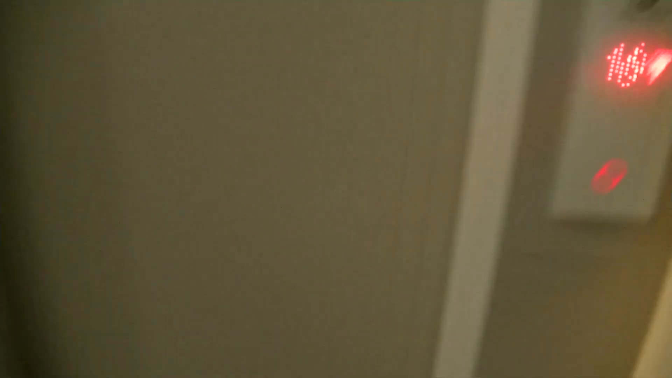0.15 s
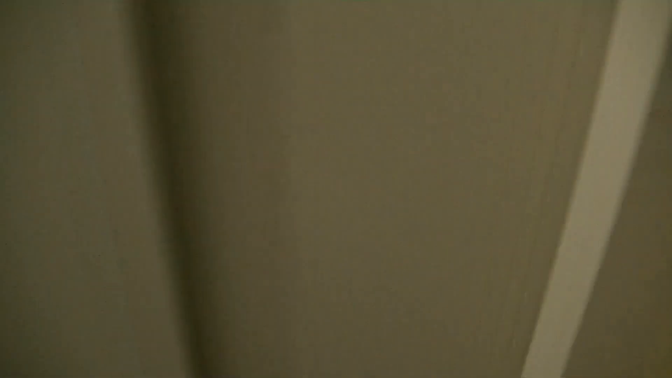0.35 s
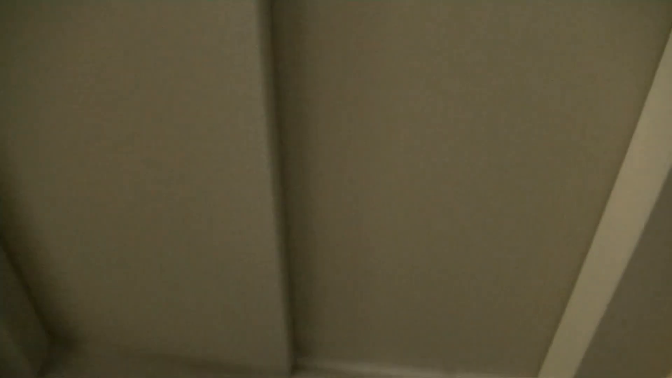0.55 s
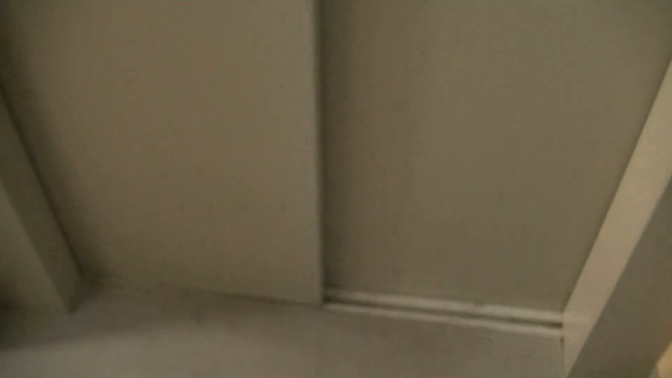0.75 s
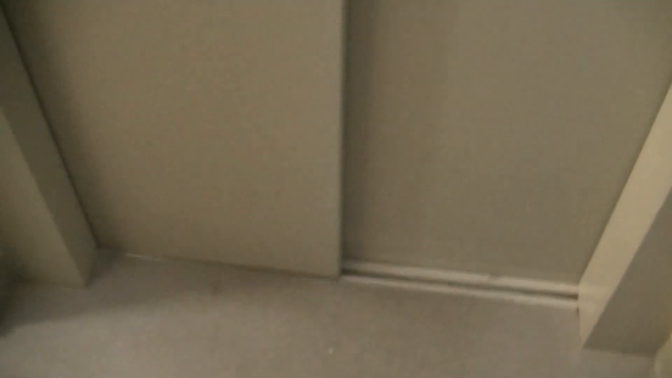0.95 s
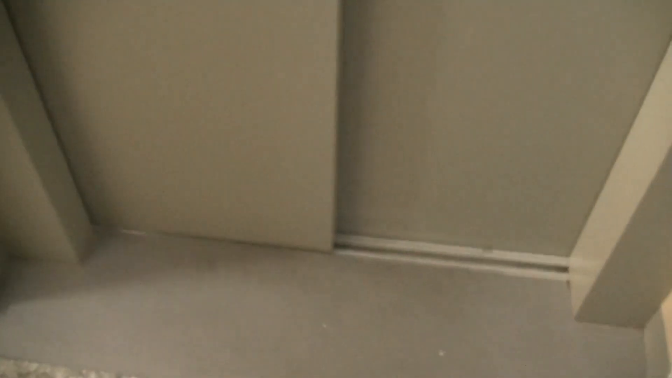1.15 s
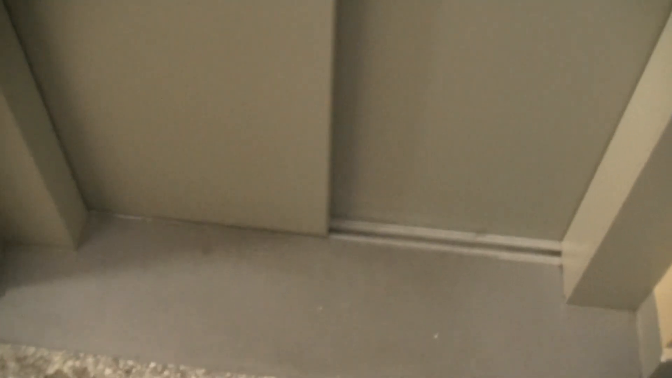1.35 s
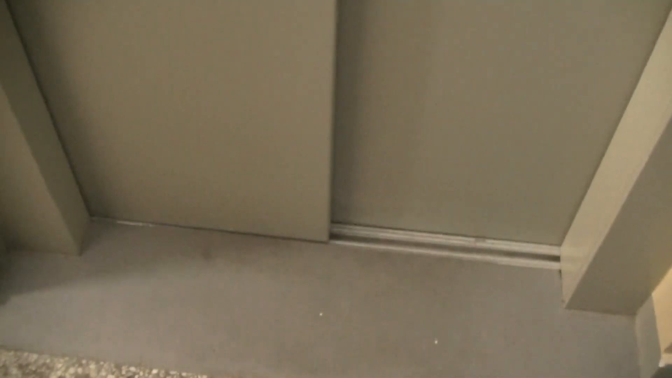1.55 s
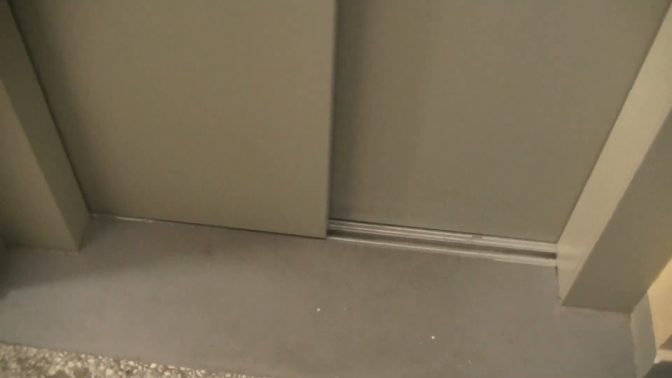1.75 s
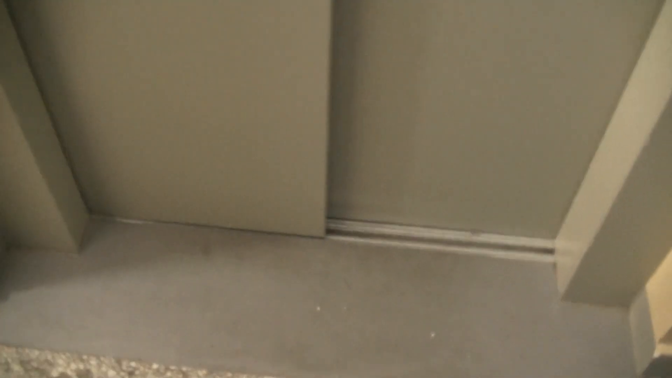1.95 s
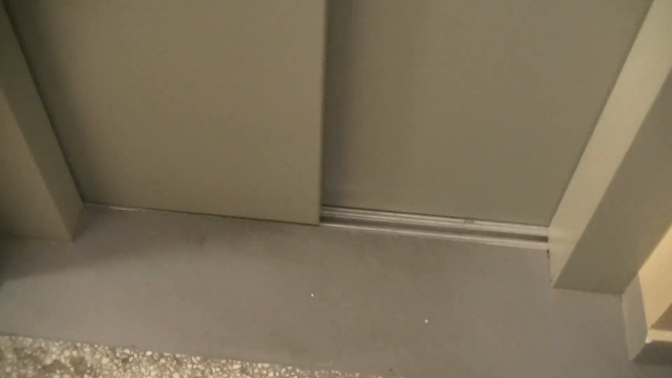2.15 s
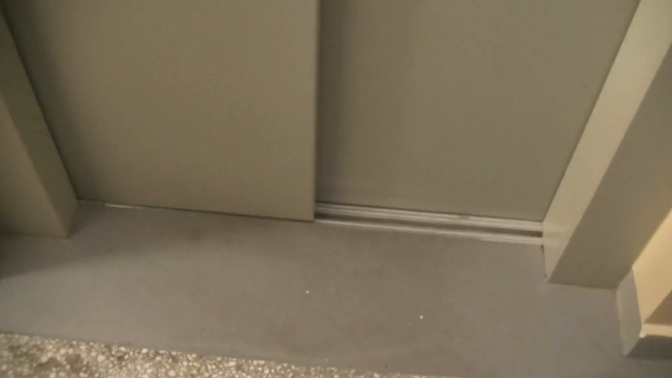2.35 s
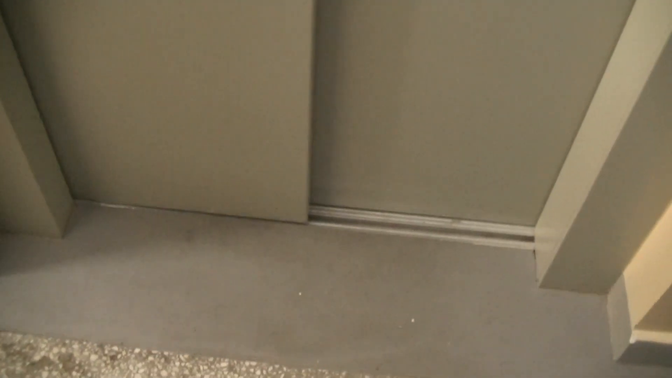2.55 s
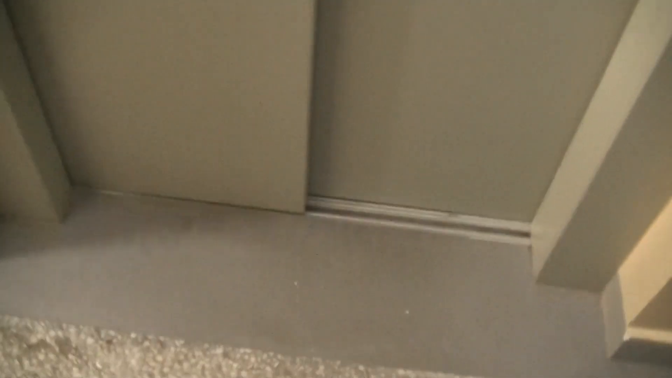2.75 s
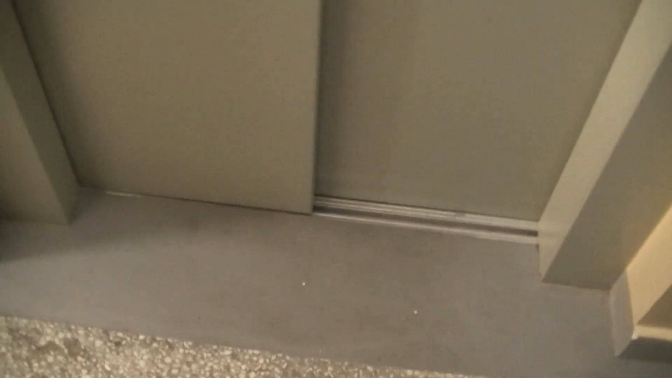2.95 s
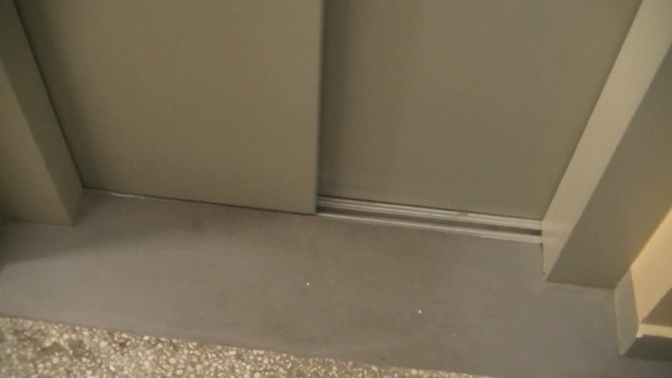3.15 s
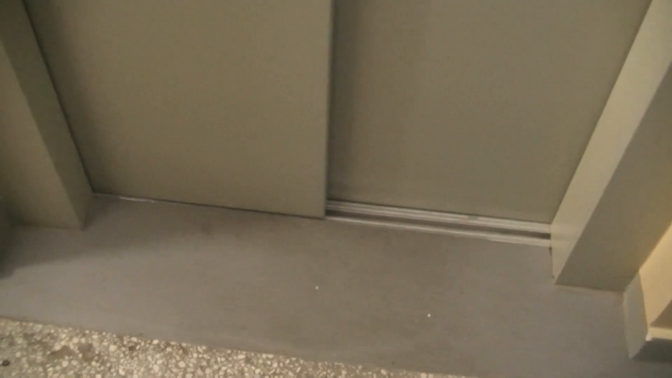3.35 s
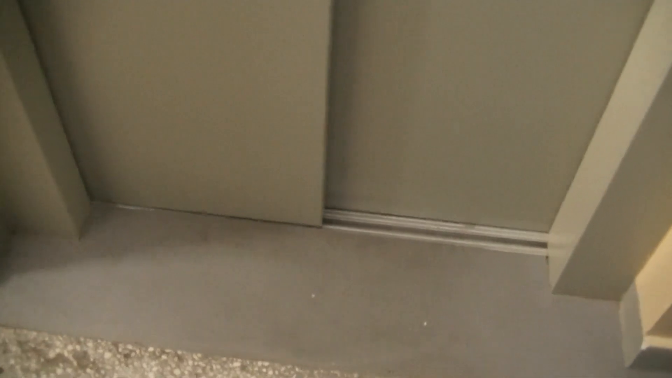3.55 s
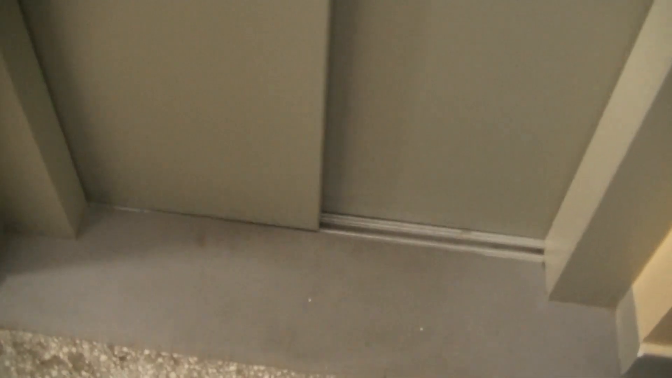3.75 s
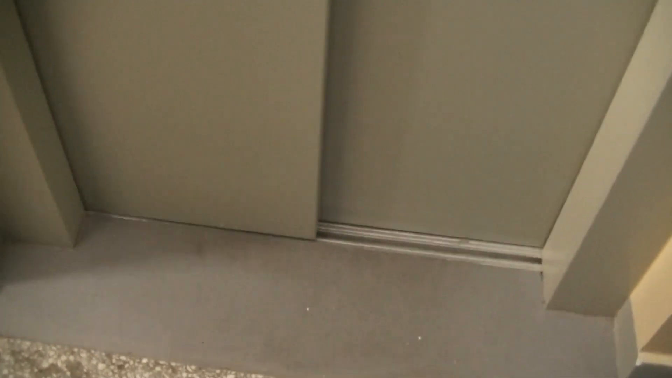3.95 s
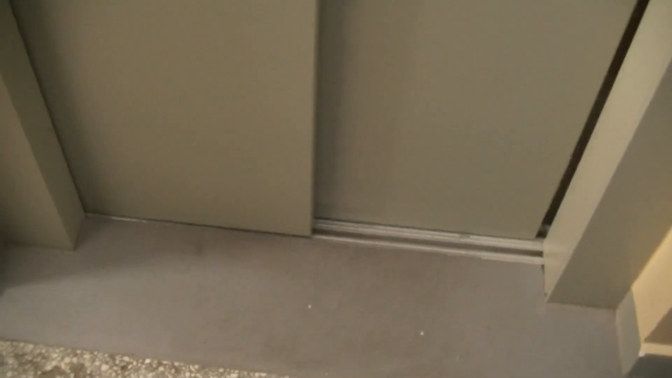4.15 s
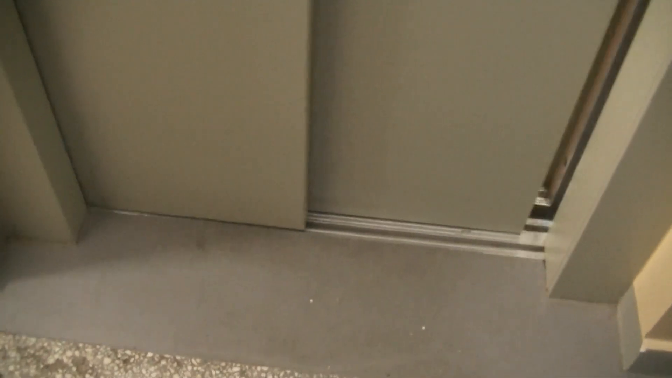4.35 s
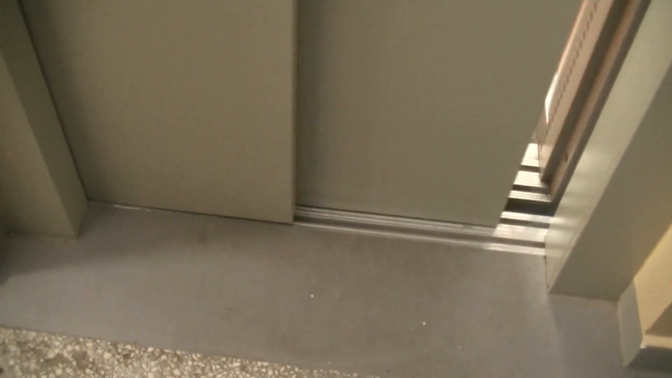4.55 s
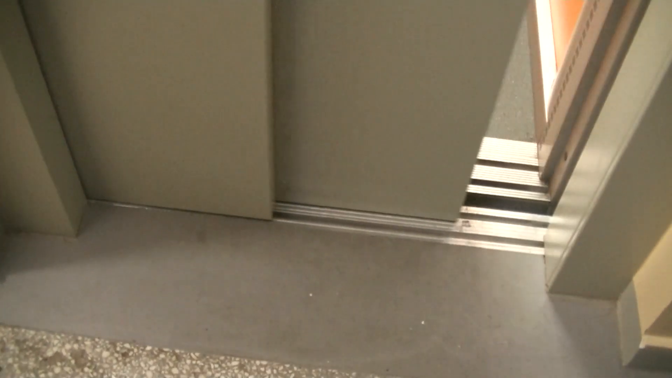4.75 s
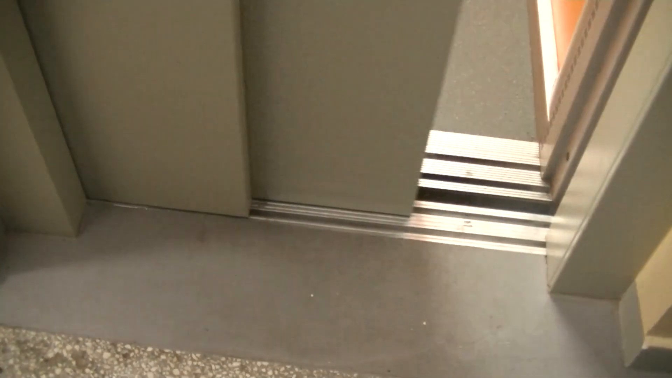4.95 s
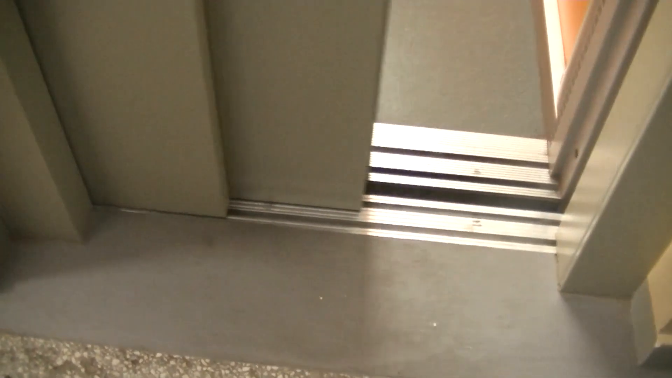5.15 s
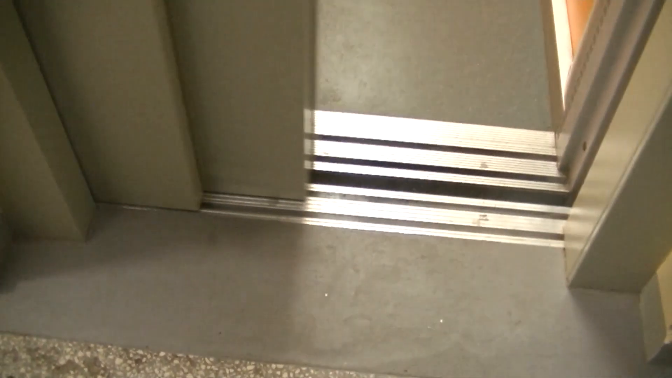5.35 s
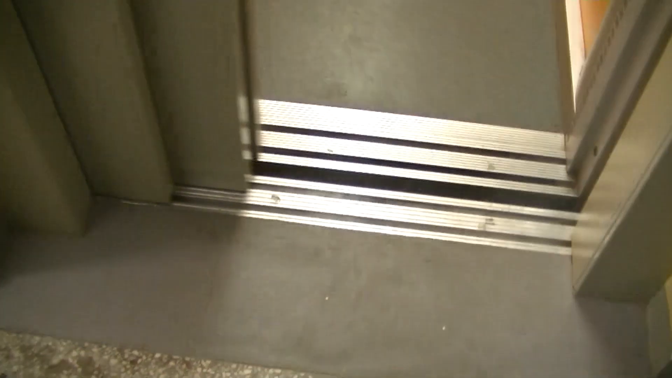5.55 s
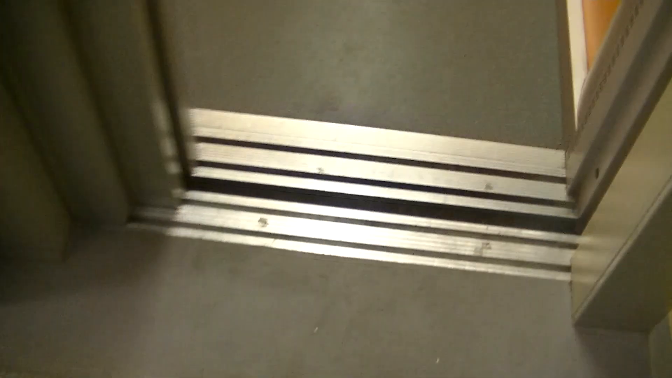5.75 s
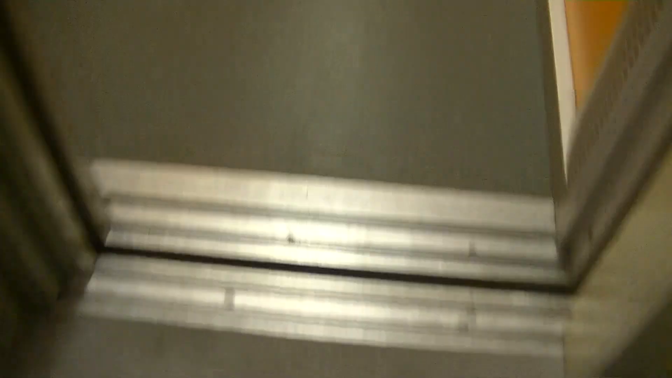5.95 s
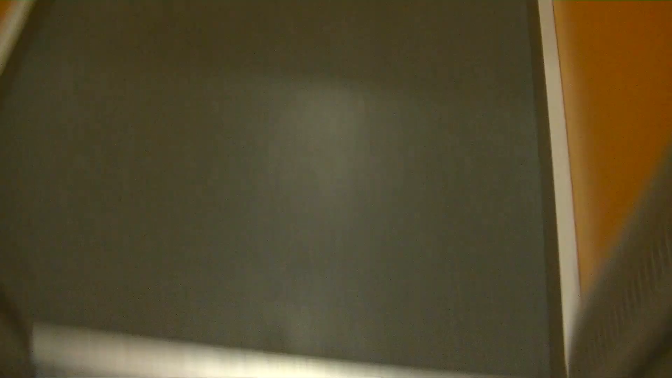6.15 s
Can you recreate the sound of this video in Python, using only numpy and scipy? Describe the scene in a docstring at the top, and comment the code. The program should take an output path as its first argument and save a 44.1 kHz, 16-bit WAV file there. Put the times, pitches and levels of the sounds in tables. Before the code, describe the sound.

Close handling noise opens the scene: cloth rubbing and several hard plastic snaps within about a second. Near silence follows, with soft hiss, a distant metallic knock and hum, and later two more thin blows. A stronger cluster of latch clunks starts the lift doors; their low rumble and gritty sliding rush swell steadily, with brief high squeaks ringing in the stairwell. A small hand-held microphone stands close to the doors.

```python
"""A quiet stairwell landing: a hand-held camera clicks and a sleeve rustles while a lift arrives.
Air, cloth, rollers and door shoes are coloured noise; the clicks are sums of short decaying modes.
Brake and latches knock in the shaft, each band of the blow ringing away at its own speed, and panel modes
hum on as wavering tones. The sheet-metal doors then slide open: rollers rumble in the panels, guide shoes
rush along the sill, with pings and squeaks as narrow noise bursts."""
import sys
import numpy as np
from scipy import signal
from scipy.fft import rfft, irfft
from scipy.io import wavfile
from scipy.ndimage import uniform_filter1d

SR = 44100
rng = np.random.default_rng(int(sys.argv[2]) if len(sys.argv) > 2 else 0)


def materialize(psi):
    """Save the field psi as 16-bit PCM at rate SR to the path in sys.argv[1].

    A 1-D psi becomes a single channel; in a 2-D psi each row is a channel.
    """
    bounded = np.clip(np.atleast_2d(psi).T, -1, 1)
    quanta = np.round(bounded * 32767).astype(np.int16)
    wavfile.write(sys.argv[1], SR, quanta)


N = 276992
TIME = np.arange(N) / SR  # s

# stereo width of the landing air and cloth: (frequency [Hz], side minus mid [dB])
AIR_WIDTH = [(60, -39), (110, -11), (200, -0.5), (380, -2), (700, -12), (1290, -11.5), (2380, -7.5),
             (4400, -6), (8120, -1), (15000, -2)]
# stereo width of the lift and the scrape: (frequency [Hz], side minus mid [dB])
LIFT_WIDTH = [(60, -16), (110, -23), (200, -24), (380, -19.5), (700, -17.5), (1290, -11.5), (2380, -11.5),
              (4400, -8.5), (8120, -1), (15000, -10)]
# door-panel modes: (frequency [Hz], width [Hz], level over the surrounding noise [dB])
PANEL_MODES = [(128, 54, 7.5), (180, 12, 7.5), (231, 14.5, 7.5), (277.5, 14.5, 13.5), (314, 11, 13),
               (356, 8.3, 14.5), (475, 4.7, 9.5), (550, 51, 4)]


def amp(db):
    """Decibels to an amplitude factor."""
    return 10 ** (np.asarray(db) / 20)


def read(points, hz):
    """Value of a (frequency, value) curve, joined by straight lines over log frequency."""
    f, value = np.transpose(points)
    return np.interp(np.log(hz + 1), np.log(f + 1), value)


def curve(rows):
    """Columns at audio rate, and a gate that is open while the rows last, with 30 ms ramps."""
    s, *columns = np.transpose(rows)
    inside = np.minimum(TIME - s[0] + 1e-3, s[-1] - TIME + 1e-3)
    gate = np.clip(inside / 0.03, 0, 1)
    return [gate] + [np.interp(TIME, s, c) for c in columns]


def modes(table, hz):
    """Gain of broad noise with resonances standing over it; their powers add."""
    peaks = sum((amp(2 * db) - 1) / (1 + (2 * (hz - f) / width) ** 2) for f, width, db in table)
    return np.sqrt(1 + peaks)


def band(hz, low_hz, high_hz):
    """Gain of a steep band-pass."""
    return 1 / np.sqrt((1 + (low_hz / (hz + 1)) ** 20) * (1 + (hz / high_hz) ** 20))


def sheet_metal(hz, depth_db):
    """The dense, uneven comb of modes of a steel panel: a random gain every 25 Hz."""
    return amp(depth_db * np.interp(hz, np.arange(640) * 25, rng.standard_normal(640)))


def noise(gain, width, size=N, patchy_db=0.):
    """Two-channel noise, rms 1 in the middle, with colour gain(hz), a stereo width and drifting patches."""
    # balance of the channels: (frequency [Hz], left minus right [dB])
    balance = [(60, -2), (110, 1.0), (200, 1), (380, 1.5), (700, 1.5), (1290, 0.0), (2380, 1), (4400, -1.5),
               (8120, 2.0), (15000, -1.5)]
    hz, frames = np.fft.rfftfreq(4096, 1 / SR), size // 1024 + 6
    a, b, c, d = rng.standard_normal((frames, len(hz), 4), dtype=np.float32).T
    mid = a + 1j * b
    side = amp(read(width, hz))[:, None] * (c + 1j * d)
    lean = amp(read(balance, hz) / 2)[:, None]
    z = np.array([(mid + side) * lean, (mid - side) / lean]) * gain(hz)[:, None]
    if patchy_db:
        patches = rng.standard_normal(a.T.shape)
        patches = uniform_filter1d(patches, size=4, axis=0)  # smooth over time
        patches = uniform_filter1d(patches, size=40, axis=1).T  # smooth over frequency
        z = z * amp(patchy_db * patches / patches.std())
    x = signal.istft(z, nperseg=4096, noverlap=3072)[1][:, 1024:1024 + size]
    return x / np.sqrt(np.mean(x.mean(0) ** 2))


def travelling(gain, depth_db, patchy_db):
    """As the shoes travel, three combs of panel modes take their turn and fade into one another."""
    cycle_s = 1.807
    total = 0
    for k in range(3):
        turn = np.cos(np.pi * (TIME / cycle_s + k / 3)) * np.sqrt(2 / 3)  # the powers sum to a constant
        comb = noise(lambda f: gain(f) * sheet_metal(f, depth_db), LIFT_WIDTH, patchy_db=patchy_db)
        total = total + turn * comb
    return total


def wavering(hz, drift_hz, size):
    """A tone of rms about 1 whose pitch and strength drift a little."""
    slow = uniform_filter1d(rng.standard_normal((2, size)), size=2000)
    pitch, strength = slow * np.sqrt(2000)  # back to a spread of about 1
    phase = 2 * np.pi * np.cumsum(hz + drift_hz * pitch) / SR
    return np.sqrt(2) * amp(2.5 * strength) * np.sin(phase)


def blow(t, rise, t60):
    """Envelope that builds up with a time constant and falls 60 dB in each t60."""
    return (1 - np.exp(-t / max(rise, 1e-4))) * amp(-60 * t / t60)


def add(mix, s, sound):
    """Lay a sound into the mix at s seconds, cut at the end of the mix."""
    part = mix[:, round(s * SR):][:, :sound.shape[1]]
    part += sound[:, :part.shape[1]]


def landing():
    """Still room air as patchy noise with faint tones, over the hiss of the microphone."""
    # colour of the air: (frequency [Hz], density [dB per Hz])
    air_colour = [(15, -65), (25, -35), (92, -22.5), (236, -4.5), (331, -4.5), (373, -4.5), (453, -7.5),
                  (523, -11), (576, -10), (1030, -15.5), (1880, -11), (8000, -19), (10400, -26),
                  (17600, -120)]
    # slow swell of the air: (time [s], level [dB])
    air_level = [(0.0, -57.5), (0.7, -55), (1.8, -56.5), (2.2, -58), (2.55, -56.5), (3.05, -62.5),
                 (3.55, -57), (4.0, -57.5)]
    # faint tones: (frequency [Hz], level over the air [dB])
    tones = [(441, -11.5), (7950, -20.5)]
    # microphone self-noise: (frequency [Hz], density [dB per Hz])
    hiss_colour = [(20, 2), (100, 3.5), (1000, -12), (4000, -8.5), (8000, -19), (12000, -14.5),
                   (15500, -20)]
    hiss_db = -61.5
    s, db = np.transpose(air_level)
    air = noise(lambda hz: amp(read(air_colour, hz)), AIR_WIDTH, patchy_db=2.5)
    air = air + sum(amp(tone_db) * wavering(hz, 2.65, N) for hz, tone_db in tones)
    hiss = noise(lambda hz: amp(read(hiss_colour, hz)), [(20, -2), (1000, 2.0), (15000, 0.0)])
    return air * amp(np.interp(TIME, s, db)) + amp(hiss_db) * hiss


def sleeve():
    """Cloth rubs near the microphone: a wide swish, a top that dulls as a stroke slows, a hollow scrape."""
    # (time [s], level [dB], rise time constant [s], t60 [s], level of the top at the start [dB over the swish])
    strokes = [(0, -46.5, 0.0085, 0.48, -1.5), (.27, -45.5, 0.17, 3.1, -13), (0.451, -35.5, 0.02, 0.71, 3),
               (.68, -43.5, 0.019, 0.44, -5.5), (.85, -55.5, 0.04, 2.6, -13), (1.1, -53, 0.022, 0.89, -5)]
    # resonances of the scrape: (frequency [Hz], width [Hz], level over broad noise [dB])
    scrape_modes = [(3300, 230, 22), (4050, 230, 22.5)]
    dulling_db_per_s, dullest_db = 77, -14
    scrape_s, scrape_db, scrape_rise_s, scrape_t60_s = 0.069, -38.5, 0.02, 0.93
    lead_in_db = -49.5  # a soft steady rub ahead of the scrape
    size = 2 * SR
    t = TIME[:size]

    def body_colour(f):
        return band(f, 1360, 5800) * modes([(2900, 1600, 8.0)], f) + 0.67 * band(f, 530, 1180)

    def bright_colour(f):
        tilt = amp(-8 * np.log2(f / 7000 + 1e-3))  # falls 8 dB per octave
        return band(f, 5000, 15000) * tilt * modes([(7100, 1600, 7.6)], f)

    body = noise(body_colour, AIR_WIDTH, size=size)
    bright = noise(bright_colour, AIR_WIDTH, size=size)
    scrape = noise(lambda f: band(f, 2700, 5400) * modes(scrape_modes, f), LIFT_WIDTH, size=size)
    body_power, bright_power = np.zeros((2, size))
    for s, db, rise, t60, bright_db in strokes:
        age = np.maximum(t - s, 0)
        power = (amp(db) * blow(age, rise, t60)) ** 2
        top_db = np.maximum(bright_db - dulling_db_per_s * age, dullest_db)
        body_power = body_power + power
        bright_power = bright_power + power * amp(2 * top_db)
    age = np.maximum(t - scrape_s, 0)
    rub = amp(scrape_db) * blow(age, scrape_rise_s, scrape_t60_s)
    rub = rub + amp(lead_in_db) * np.exp(-age / scrape_rise_s)
    out = np.sqrt(body_power) * body + np.sqrt(bright_power) * bright + rub * scrape
    return np.pad(out, ((0, 0), (0, N - size)))


def shell_ring(table):
    """A snap swells and dies in short modes, with a faint rebound; peak 1."""
    t = np.arange(1200) / SR
    ring = 0
    for k, (hz, width, db) in enumerate(table):
        age = np.pi * width * t  # in decay times of the mode
        swell = width * age * np.exp(-age)
        ring = ring + (-1) ** k * amp(db) * swell * np.sin(2 * np.pi * hz * t)
    ring = ring + 0.16 * np.pad(ring, (175, 0))[:len(t)]  # rebound 4 ms later
    return ring / abs(ring).max()


def clicks():
    """Dry snaps of the camera shell right at the microphone, blending a bright and a dull ring."""
    # (time [s], level [dB], share of the duller ring [0-1])
    snaps = [(0.0817, -21.5, 0.16), (0.3924, -10.5, 0), (0.5926, -17.5, 0.83), (0.895, -10, 0.08),
             (1.1287, -29, 0.72)]
    # modes of the bright ring: (frequency [Hz], width [Hz], level [dB])
    bright_modes = [(193, 360, -13), (1580, 480, -15.5), (2380, 230, -10), (2820, 280, -2), (3410, 270, 5),
                    (3910, 530, 1), (5140, 380, -2), (5540, 400, -7), (6300, 730, -7.5), (7380, 850, -12),
                    (8410, 920, -10), (10850, 1200, -23), (13200, 950, -26), (14800, 1200, -38)]
    # modes of the dull ring: (frequency [Hz], width [Hz], level [dB])
    dull_modes = [(190, 870, -6.5), (2010, 680, 4.5), (2600, 370, -7), (2800, 270, -7), (3930, 780, 1),
                  (5640, 600, -13), (8350, 900, -19)]
    out, bright, dull = np.zeros((2, N)), shell_ring(bright_modes), shell_ring(dull_modes)
    pan = amp([[-.5], [.5]])  # a little to the right
    for s, db, share in snaps:
        share = np.clip(share, 0, 1)
        add(out, s, amp(db) * pan * ((1 - share) * bright + share * dull))
    return out


def hums():
    """Single door-panel modes, set going by a blow or by the rollers, that sing on as tones."""
    # (time [s], level [dB], frequency [Hz], time the mode is driven [s])
    singing = [(1.634, -54, 333, .03), (1.816, -37.5, 305, 0.009), (1.83, -50.5, 490, 0.058),
               (1.91, -69.5, 1040, 0.45), (2.949, -54, 337, 0.23), (3.737, -43, 782, .01),
               (3.739, -39, 231.7, 0.18), (4.9, -41, 361, 0.3), (4.996, -34, 234.3, 0.23),
               (5.362, -38, 442.4, .11), (5.53, -35.5, 189, .13), (6.1, -41, 190.4, 0.08)]
    rise_per_hold = 0.14
    t60_base_s, t60_per_hold = 0.21, 4.4  # the longer a mode is driven, the longer it dies
    out, t = np.zeros((2, N)), np.arange(SR) / SR
    for s, db, hz, hold in singing:
        rise, t60 = rise_per_hold * hold, t60_base_s + t60_per_hold * hold
        shape = (1 - np.exp(-t / rise)) * amp(-60 * np.maximum(t - hold, 0) / t60)
        level = amp(db + np.array([[.5], [-.5]]))  # a little to the left
        add(out, s, level * shape * wavering(hz, 3., SR))
    return out


def knocks():
    """Each blow arrives already smeared by the shaft; every band dies at its own speed."""
    # (time [s], level [dB], clank [dB], boom [dB], treble [dB], rise [s]); bands are relative to the level
    blows = [(1.638, -43, -3.5, 4.5, -9, 0.011), (1.8154, -31, 2.5, 1.5, -9, 0.011),
             (2.7306, -46, -19, -7.5, 5.5, 0.006), (2.938, -36, -10.5, -2.5, -3, .014),
             (3.590, -22.5, -13.5, -2.5, -6.5, 0.016), (3.728, -28, -24, 1.5, -9.5, 0.004),
             (3.819, -34, -8, -18, 0, 0.0052), (3.9053, -31.5, -5.5, -8, -8, .02),
             (4.015, -46, -11, -18, -3, .002), (4.036, -54, -10, -15, 9.5, 0.0016)]
    # lead, low clank, high clank, boom, hollow, treble, sizzle: (low edge [Hz], high edge [Hz])
    bands = [(2450, 3600), (1620, 2450), (3600, 4500), (60, 620), (620, 1620), (4500, 9500), (9500, 16000)]
    # base decay time of each of those bands, scaled below: (t60 [s])
    band_t60 = [0.83, 0.8, 0.84, 1.19, 0.77, 0.25, 0.23]
    # colour of a blow: (frequency [Hz], density [dB per Hz])
    blow_colour = [(35, -60), (60, -17), (110, -0.5), (300, -0.5), (515, 0), (640, -18.5), (950, -16),
                   (1300, -23), (1750, -17), (2200, -14.5), (2700, -15.5), (4000, -11.5), (5700, -11),
                   (9800, -23.5), (16000, -19)]
    lead_db, hollow_db, sizzle_db = -5.5, -7, -13.5  # set off from the level, boom and treble
    latch_s = 3.3  # until then blows come from up the shaft and are thin; later latches at the landing go deeper
    far_boom_hz, near_boom_hz = 220, 100  # low cut
    far_high_clank_db, near_high_clank_db = -5, -7  # against the low clank
    ring_out = 0.73  # scales every decay
    crack_db, crack_loss_db_per_s = 12.5, 2000  # only quick blows crack
    out, t = np.zeros((2, N)), np.arange(SR) / SR
    for s, db, clank_db, boom_db, treble_db, rise in blows:
        near = s > latch_s
        boom_hz = near_boom_hz if near else far_boom_hz
        high_db = near_high_clank_db if near else far_high_clank_db

        def metal_colour(f):
            return amp(read(blow_colour, f)) * modes(PANEL_MODES, f) * band(f, boom_hz, SR) * sheet_metal(f, 2.6)

        colour_db = [lead_db, clank_db, clank_db + high_db, boom_db, boom_db + hollow_db,
                     treble_db, treble_db + sizzle_db]
        z = rfft(noise(metal_colour, LIFT_WIDTH, size=SR))
        hz = np.arange(z.shape[1])  # one second of noise, so bins are 1 Hz apart
        for (low, high), t60, rel_db in zip(bands, band_t60, colour_db):
            ring = irfft(z * band(hz, low, high), SR)
            slow = rise * (1 + 200 / low)  # bass builds up later
            landing_tail = blow(t, slow, t60 * ring_out * 0.27)
            shaft_tail = 0.22 * blow(t, slow, t60 * ring_out * 2.09)
            add(out, s - .002, amp(db + rel_db) * (landing_tail + shaft_tail) * ring / ring.mean(0).std())
        crack = irfft(z * band(hz, 5300, 6700), SR)  # the direct snap of metal
        snap_db = db + treble_db + crack_db - crack_loss_db_per_s * rise
        add(out, s, amp(snap_db) * blow(t, .0004, .018) * crack / crack.std())
    return out


def squeaks():
    """Metal pings and shoes catching on the sill: narrow noise bursts that ring out in the stairwell."""
    # (time [s], level [dB], frequency [Hz], width [Hz], t60 [s], left minus right [dB])
    bursts = [(1.82, -41, 1870, 300, 1.1, -1), (1.82, -40, 4000, 350, 0.81, 0),
              (1.82, -42, 5200, 500, .35, -5), (2.94, -43, 914, 71, 0.36, 0),
              (3.494, -51, 3380, 600, 0.45, 0), (3.593, -40, 7760, 250, 0.15, 11),
              (3.598, -46, 6660, 200, .25, 0), (3.728, -37, 5510, 203, .2, -4),
              (3.73, -50, 13600, 1500, 0.09, 0), (3.818, -40.5, 6470, 150, 0.2, 0),
              (3.735, -31, 3860, 500, 0.22, 2), (4.036, -34.5, 5370, 1800, 0.06, -2.5),
              (4.15, -43.5, 3300, 200, 0.99, 1), (4.419, -38.5, 3820, 90, 2, -2),
              (4.941, -23.5, 4045, 250, 0.43, -1), (4.94, -26.5, 4760, 900, 0.24, -5),
              (5.059, -21, 4030, 300, 0.74, -1), (5.061, -23, 3820, 1480, 0.81, -4),
              (5.58, -29, 4410, 307, 0.74, -1), (5.798, -27, 2850, 250, 0.45, 0),
              (5.95, -32.5, 3940, 300, 1.5, 1), (6.002, -35.5, 5330, 200, 0.68, -7),
              (6.087, -31.5, 8500, 110, 0.19, 6)]
    rise_share = 0.021  # rise time constant as a share of the t60
    out, t = np.zeros((2, N)), np.arange(SR // 2) / SR
    fade = signal.windows.tukey(2 * len(t), .2)[len(t):]  # closes the last 0.1 s
    for s, db, squeak_hz, width, t60, pan_db in bursts:
        rub = noise(lambda f: 1 / (1 + (2 * (f - squeak_hz) / width) ** 2),
                    [(20, -16), (16000, -10.5)], size=len(t))
        level = amp(db + np.array([[pan_db], [-pan_db]]) / 2)
        add(out, s, level * blow(t, rise_share * t60, t60) * fade * rub)
    return out


def doors():
    """Rollers shake the panels; shoes rub the sill and excite its resonances."""
    # doors in motion: (time [s], rush of the shoes [dB], rumble of the rollers [dB])
    slide = [(3.36, -70, -68), (3.5, -51.5, -63), (3.65, -56, -46), (3.77, -37, -37), (3.85, -45, -39),
             (3.98, -46, -45.5), (4.18, -45, -48.5), (4.37, -39, -52.5), (4.76, -34.5, -41),
             (4.99, -32, -32), (5.12, -30.5, -34.5), (5.59, -29.5, -32), (5.74, -27.5, -34),
             (6.02, -30, -37), (6.17, -28, -39.5), (6.28, -34, -39)]
    # colour of the shoes, also for the drone: (frequency [Hz], density [dB per Hz])
    rush_colour = [(290, -37), (500, -15), (560, -3), (695, -7.5), (1280, -9.5), (1860, -3.5), (3210, -1),
                   (3550, -2.5), (4070, -0.5), (4770, -6.5), (6260, -9), (7500, -15.5), (9750, -51),
                   (16500, -120)]
    # colour of the rollers: (frequency [Hz], density [dB per Hz])
    rumble_colour = [(35, -56), (60, -11), (182, 7.5), (210, 7), (363, 2), (398, 9), (450, 5.5),
                     (700, -4.5), (910, -34), (1540, -120)]
    # colour of the fizz: (frequency [Hz], density [dB per Hz])
    fizz_colour = [(3820, -25), (6500, -2.5), (7630, -6), (9570, -15), (11400, -18), (13700, -20),
                   (15800, -32)]
    # resonances of the sill: (frequency [Hz], width [Hz], level over the rush [dB])
    sill_modes = [(2620, 410, 3), (3184, 140, 3.5), (3930, 490, 2), (5110, 36, 2), (5170, 60, 2.5),
                  (6300, 80, 7), (9800, 200, 8)]
    full_rush_db = -30.5
    full_drone_db, drone_follows = -43.5, .75  # level at full rush, dB per dB of rush
    full_fizz_db, fizz_follows = -47, 1.4  # the same for the fizz
    gap_s, gap_opens_s, shut_fizz_db = 4.2, 0.16, -12  # shut doors muffle the fizz until the gap opens
    wide_open_s, top_hz, top_shut_db = 5.6, 4600, -2.5  # the top of the rush clears slowly as the gap widens

    gate, rush_db, rumble_db = curve(slide)
    gate = np.maximum(gate, TIME > 6)  # still sliding at the end
    shut = np.clip(1 - (TIME - gap_s) / gap_opens_s, 0, 1)
    drone_db = full_drone_db + drone_follows * (rush_db - full_rush_db)
    fizz_db = full_fizz_db + fizz_follows * (rush_db - full_rush_db) + shut_fizz_db * shut

    def drone_gain(f):
        return amp(read(rush_colour, f)) * band(f, 450, 1455) * sheet_metal(f, 3.45)

    def rush_gain(f):
        return amp(read(rush_colour, f)) * modes(sill_modes, f) * band(f, 1520, 6700)

    def fizz_gain(f):
        return amp(read(fizz_colour, f)) * modes(sill_modes, f) * band(f, 6380, 17000) * sheet_metal(f, 1.4)

    rumble = noise(lambda f: amp(read(rumble_colour, f)) * modes(PANEL_MODES, f), LIFT_WIDTH, patchy_db=1.5)
    drone = noise(drone_gain, LIFT_WIDTH, patchy_db=0.5)
    rush = travelling(rush_gain, depth_db=4.0, patchy_db=2.4)
    top = signal.sosfiltfilt(signal.butter(4, top_hz, "high", fs=SR, output="sos"), rush)
    top_db = np.interp(TIME, [gap_s, wide_open_s], [top_shut_db, 0])
    rush = rush + (amp(top_db) - 1) * top
    fizz = noise(fizz_gain, LIFT_WIDTH, patchy_db=2.0)
    judder = uniform_filter1d(rng.standard_normal(N), size=300)  # the grip of the shoes flickers
    judder = amp(0.35 * judder / judder.std())
    shoes = judder * (amp(rush_db) * rush + amp(fizz_db) * fizz)
    return gate * (amp(rumble_db) * rumble + amp(drone_db) * drone + shoes)


def scene():
    """All the layers, summed."""
    return landing() + sleeve() + clicks() + hums() + knocks() + squeaks() + doors()


def record(dry):
    """The small microphone drops the deepest bass; then a steep low-pass limits the band."""
    edge_hz = 15780
    thin = signal.sosfilt(signal.butter(1, 70, "high", fs=SR, output="sos"), dry)
    low_pass = signal.firwin(511, edge_hz, window=("kaiser", 10), fs=SR)
    return signal.oaconvolve(thin, low_pass[None], "same")


dry = scene()
out = record(dry)
materialize(out)
```